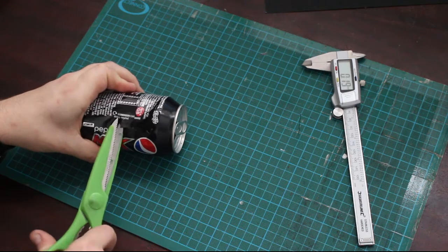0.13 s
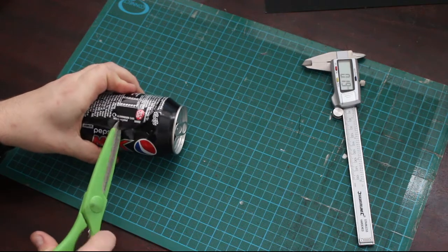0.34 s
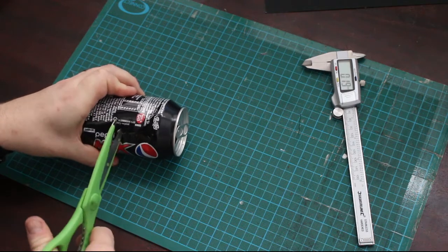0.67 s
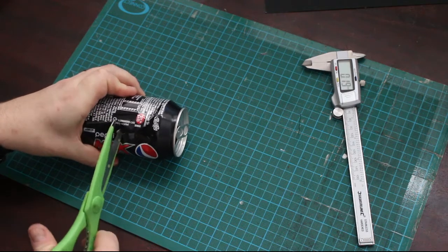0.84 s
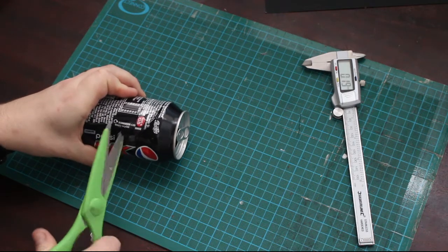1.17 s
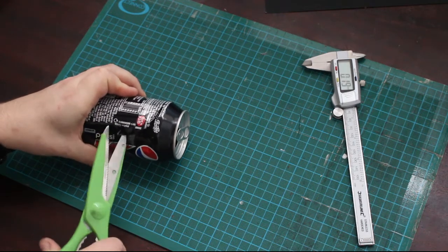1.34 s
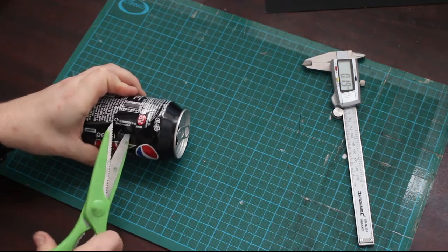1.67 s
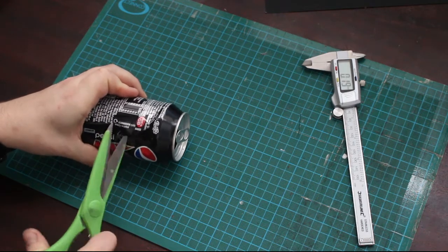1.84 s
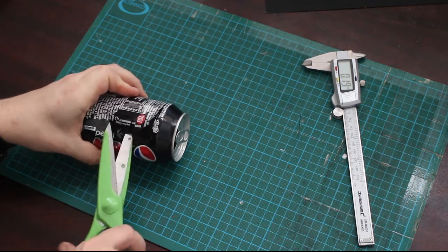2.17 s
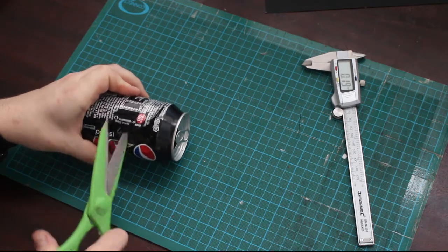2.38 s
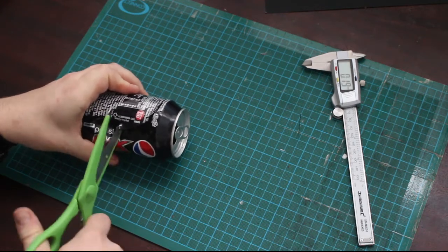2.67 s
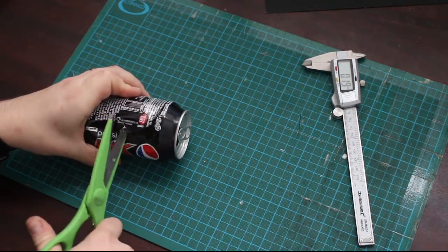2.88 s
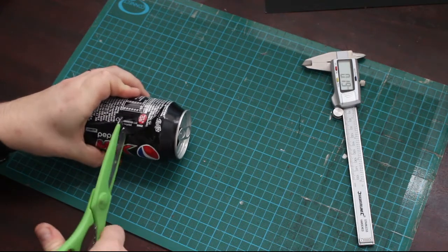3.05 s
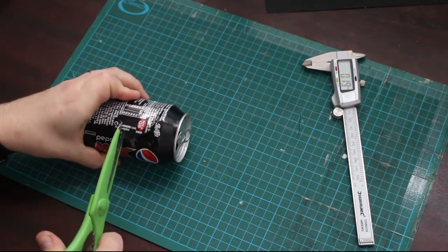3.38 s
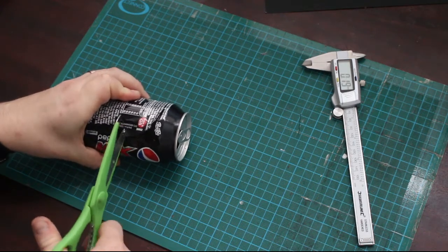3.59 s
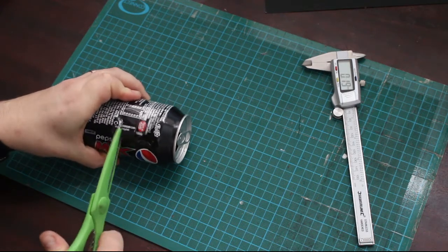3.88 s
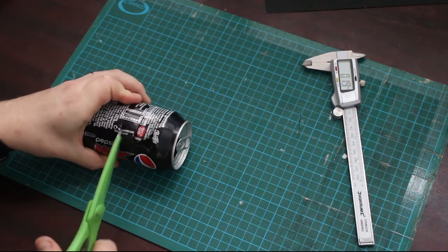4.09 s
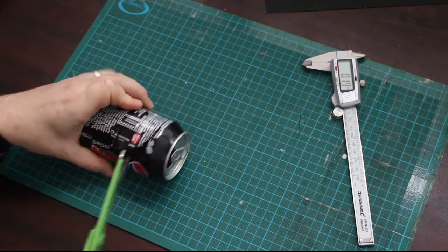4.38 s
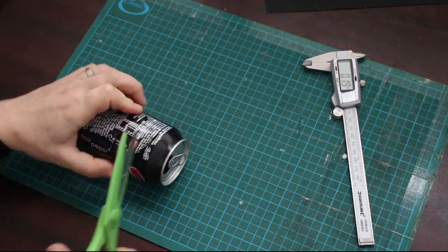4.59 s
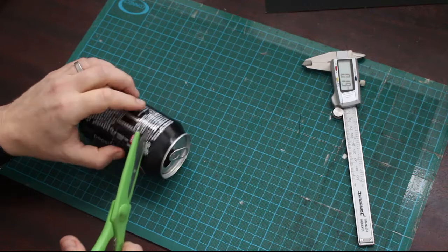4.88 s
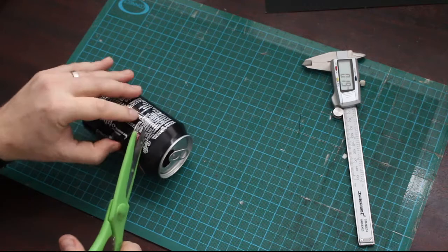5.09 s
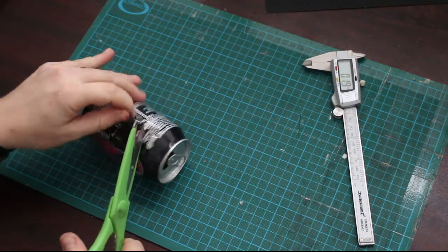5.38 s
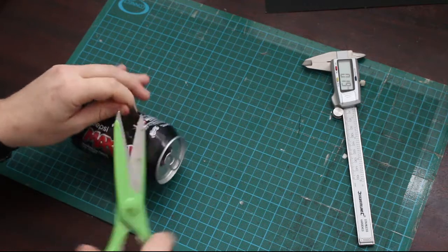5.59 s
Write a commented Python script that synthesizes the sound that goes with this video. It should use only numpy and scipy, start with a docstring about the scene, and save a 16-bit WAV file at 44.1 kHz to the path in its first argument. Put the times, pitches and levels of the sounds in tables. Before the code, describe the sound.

Close, dry cutting of a drinks can: blades rasp, thin metal tears and pops, and the hollow body hoots briefly with each stroke.

```python
"""A small room: kitchen scissors cut the thin wall of an empty aluminium can just above a cutting mat.
The blades rasp (random clicks through the can's resonances) and make the air in the can hoot (a wavering sine).
The wall tears and buckles in snaps (fading noise), dented panels ping and chime (fading sines), the can bumps
the mat (low noise), and hard cuts leave the steel ringing. A low hum, rumble and room tone lie underneath.
A close mono microphone hears it all, overloaded by the hardest snaps."""
import sys
import numpy as np
from scipy import signal
from scipy.fft import rfft, irfft, next_fast_len
from scipy.io import wavfile

SR = 44100
rng = np.random.default_rng(int(sys.argv[2]) if len(sys.argv) > 2 else 0)


def to_wav(sig):
    """Store sig (one row per channel, or 1-D mono) as 16-bit WAV at the path in sys.argv[1].

    Samples outside -1..1 are clipped; the rate is SR.
    """
    pcm = np.clip(np.atleast_2d(sig), -1, 1) * 32767
    pcm = np.round(pcm).astype(np.int16)
    wavfile.write(sys.argv[1], SR, pcm.T)  # frames by channels


N = 252693  # length in samples


def from_db(db):
    """Turn decibels into a plain gain."""
    return 10 ** (np.asarray(db) / 20)


def rms_one(x):
    """Scale the whole sound to rms 1."""
    return x / np.sqrt(np.mean(x ** 2) + 1e-20)


def attack_one(x):
    """Scale so that the first hundredth of a second has rms 1."""
    return x / np.sqrt(np.mean(x[:SR // 100] ** 2) + 1e-20)


def at_hz(points, hz, axis=1):
    """Read a table column at any frequency, with pitch spaced by octaves."""
    points = np.array(points)
    return np.interp(np.log(np.maximum(hz, 1)), np.log(points[:, 0]), points[:, axis])


def fade(t, t60):
    """Die away smoothly, losing 60 dB in t60 seconds."""
    return np.exp(-np.log(1000) * t / max(t60, .002))


def band(x, edges, order=3):
    """Keep only the frequencies between two edges."""
    sos = signal.butter(order, np.minimum(edges, .48 * SR), "band", fs=SR, output="sos")
    return signal.sosfilt(sos, x + 1e-18)


def dull(x, hz, order=2):
    """Soften everything above hz."""
    return signal.sosfilt(signal.butter(order, min(hz, .45 * SR), fs=SR, output="sos"), x)


def resonance(x, hz, width_hz):
    """Ring at one frequency when shaken; a narrow width rings longer."""
    r = np.exp(-np.pi * width_hz / SR)
    push = np.array([1, 0, -1]) * (1 - r * r) / 2
    memory = [1, -2 * r * np.cos(2 * np.pi * hz / SR), r * r]
    return signal.lfilter(push, memory, x + 1e-18)


def add(out, s, x):
    """Mix x into out, starting at s seconds."""
    at = max(round(s * SR), 0)
    out[at:at + len(x)] += x[:max(N - at, 0)]


def waver(n, rate_hz):
    """Slow random wandering of spread 1."""
    return rms_one(dull(rng.standard_normal(n + SR // 10), rate_hz))[-n:]


AMBIENCE_DB = -49.5
HUM_HZ, HUM_DB = 58.4, -59
# tone colour of the room's own noise; only the shape counts: f/Hz, level/dB (per Hz)
AMBIENCE_COLOUR = [(20, -4), (45, -6), (90, -17.5), (220, -13), (380, -17.5), (560, -9.5), (800, -20),
                   (1400, -21), (3500, -26.5), (6000, -32), (8200, -33), (16000, -37)]
# handling rumble through the table, joined by straight lines: t/s, level/dB
HANDLING_RUMBLE = [(0, -73), (1.3, -60), (1.9, -55), (2.3, -52.5), (2.78, -52.5), (2.85, -40), (2.97, -45),
                   (3.4, -67), (3.95, -57), (4.25, -46), (4.6, -51), (5.3, -75), (5.7, -47)]


def background():
    """Coloured noise as room tone, a low sine hum, and low noise for the rumble of hands on the table."""
    t, size = np.arange(N) / SR, next_fast_len(N, True)
    colour = from_db(at_hz(AMBIENCE_COLOUR, np.fft.rfftfreq(size, 1 / SR)))
    noise = irfft(rfft(rng.standard_normal(size)) * colour, size)[:N]
    tone = from_db(AMBIENCE_DB) * rms_one(noise)
    rumble_level = from_db(np.interp(t, *np.transpose(HANDLING_RUMBLE)))
    rumble = rumble_level * rms_one(band(rng.standard_normal(N), (32, 72), order=2))
    hum = from_db(HUM_DB) * np.sqrt(2) * np.sin(2 * np.pi * HUM_HZ * t)
    return tone + rumble + hum


# broad resonances of the can wall: f/Hz, width/Hz, level/dB
WALL_RESONANCES = [(741, 55, 12), (862, 41, 10), (954, 320, -0.5), (1286, 12, 6), (1508, 18, -0.5),
                   (1798.5, 41, 12.5), (2280, 33, -0.5), (2553, 27, 8.5), (3067, 180, 2), (3366, 85, 14),
                   (3500, 2000, 0), (5110, 180, 13.5), (5440, 110, 2.5), (7225, 280, 13.5), (8100, 690, 5)]


def wall(force):
    """The can wall colours whatever shakes it; neighbouring resonances swing in opposite directions."""
    out = 0
    for k, (hz, width_hz, db) in enumerate(WALL_RESONANCES):
        out = out + (-1) ** k * from_db(db) * resonance(force, hz, width_hz)
    return out


def slips(n, per_s, spread_db):
    """Tiny stick-slip clicks of uneven size at random moments."""
    sizes = from_db(spread_db * np.minimum(rng.exponential(1, n), 4))
    return (rng.random(n) < per_s / SR) * sizes * rng.choice([-1, 1], n)


RASP_HZ, HISS_HZ, HISS_TOP_HZ = (780, 2670), (3500, 24000), 7600  # bands of the dragging blade
SWELL_DB, EASE_DB = 11, 11  # pressure builds up to the bite, then eases off
BEND = 0.049  # relative climb of the air pitch over a stroke
CRINKLES_PER_S, CRINKLE_DB = 35, -8  # burrs breaking off under the blade; level against the hiss


def rub(rise, fall, air_hz, air_db, rasp_db, hiss_db):
    """Steel drags on the cut edge: clumps of slips rasp in the wall and keep the air hooting."""
    t, length = np.arange(int(.6 * SR)) / SR, rise + fall
    swell = from_db(np.interp(t, [0, rise, length], [-SWELL_DB, 0, -EASE_DB]))
    pressure = swell * (1 - fade(t, t60=0.004)) * fade(np.maximum(t - length, 0), t60=0.082)
    grip = waver(len(t), rate_hz=47)
    friction = slips(len(t), per_s=7000, spread_db=2.0) * from_db(2.2 * grip)
    metal = wall(friction)
    rasp_sound = dull(band(metal + .35 * friction, RASP_HZ), hz=1500, order=1)
    rasp = from_db(rasp_db) * rms_one(rasp_sound)

    # the finest slips merge into a smooth hiss; single burrs crinkle above it
    grit = (rng.standard_normal(len(t)) + .8 * rms_one(friction)) * from_db(1.5 * grip)
    crinkles = rms_one(slips(len(t), CRINKLES_PER_S, spread_db=-1))
    grit = rms_one(grit) + from_db(CRINKLE_DB) * crinkles
    hiss_sound = band(grit + .5 * wall(grit), HISS_HZ, order=2)
    hiss = from_db(hiss_db) * rms_one(dull(hiss_sound, HISS_TOP_HZ, order=3))

    # a light rasp lets the air hoot smoothly, a heavy one breaks the tone up
    rough = np.clip(1 + (rasp_db - air_db + 4.0) / 16, .15, 1.2)
    # the wall flexes under the blade, so the pitch climbs through the stroke and wanders
    climb = BEND * (np.minimum(t / length, 1.5) - .5)
    bend = climb + 0.061 * rough * waver(len(t), rate_hz=49.3)
    phase = 2 * np.pi * np.cumsum(air_hz * (1 + bend)) / SR
    hoot = rms_one(np.sin(phase) * from_db(6.9 * rough * grip))
    airy_slips = resonance(band(friction, (470, 950)), air_hz * 1.237, width_hz=65)
    rustle = from_db(-1.0) * rough * rms_one(airy_slips)
    air = from_db(air_db) * rms_one(hoot + rustle)
    return pressure * (rasp + hiss + air)


# a blade drags along the cut edge; levels are before the pressure swell:
# start t/s, rise/s, fall/s, mid-stroke air f/Hz, air level/dB, rasp level/dB, hiss level/dB
BLADE_STROKES = [(0, 0.0045, 0.029, 572, -18, -27, -39.5), (.255, 0.019, 0.033, 530, -34, -36.5, -47),
                 (.342, 0.0096, 0.038, 556, -25.5, -42, -51), (.572, 0.034, 0.017, 525, -25, -30.5, -38.5),
                 (.612, 0.014, 0.045, 556.4, -13, -32, -45), (.98, 0.025, 0.054, 539, -42, -50, -66),
                 (1.138, 0.012, 0.11, 543, -26.5, -27, -45), (1.3, 0.034, 0.058, 555, -25, -35.5, -42.5),
                 (1.39, 0.055, 0.14, 590, -29, -33.5, -39.5), (1.71, .1, 0.13, 570, -32.5, -41.5, -52),
                 (1.94, 0.038, 0.16, 580, -27.5, -37, -49.5),
                 (2.287, 0.031, 0.018, 594.3, -16.5, -19.5, -34),
                 (2.438, 0.04, 0.022, 560, -18, -15.5, -35.5), (2.775, 0.0055, 0.089, 550, -33, -43, -57),
                 (2.91, 0.1, 0.063, 595, -22, -31, -49), (3.09, 0.045, 0.066, 524.6, -28, -33.5, -48.5),
                 (3.497, 0.038, 0.074, 527.8, -19, -29, -43), (3.745, .02, 0.063, 581, -20.5, -29, -43),
                 (3.822, 0.005, 0.055, 552, -14, -30, -42), (3.99, 0.0053, 0.162, 568, -30, -36, -36.5),
                 (4.128, 0.0087, 0.023, 584, -20, -33, -45),
                 (4.168, 0.015, 0.077, 559.6, -21.5, -25, -26.5), (4.36, 0.085, .31, 565, -51, -45.5, -51),
                 (4.82, 0.035, 0.053, 585, -31, -41, -54), (4.895, 0.036, 0.16, 572, -33, -38.5, -46),
                 (5.12, 0.0066, 0.047, 588, -17.5, -25.5, -37.5),
                 (5.458, 0.024, 0.0035, 554.5, -21, -30, -27)]


def strokes(out):
    """Each drag of a blade, pressing harder and then easing off."""
    for s, rise, fall, *stroke in BLADE_STROKES:
        add(out, s, rub(max(rise, .003), max(fall, .003), *stroke))


# the room's answer: f/Hz, level/dB, t60/s
ROOM_ANSWER = [(150, -1, 0.29), (517, -13.5, 0.22), (1180, -14.5, 0.38), (2520, -12.5, 0.4),
               (4930, -10, 0.4), (9200, -13.5, 0.43), (15000, -8.5, 0.26)]


def room(x):
    """A diffuse tail builds up after the first wall echoes and dies band by band."""
    t = np.arange(int(.7 * SR)) / SR
    edges = np.geomspace(100, 17000, 13)
    build_up = 1 - fade(np.maximum(t - .004, 0), t60=0.034)
    response = np.zeros(len(t))
    for low, high in zip(edges, edges[1:]):
        hz = np.sqrt(low * high)
        die_away = fade(t, at_hz(ROOM_ANSWER, hz, axis=2))
        tail = band(rng.standard_normal(len(t)), (low, high)) * build_up * die_away
        # a wider band carries more of the tail
        share = np.sqrt(2 * (high - low) / SR / len(t))
        response += from_db(at_hz(ROOM_ANSWER, hz)) * rms_one(tail) * share
    return signal.fftconvolve(x, response)[:N]


# bands of a snap
THUD_HZ, BUCKLE_HZ, TEAR_HZ, CRACK_HZ = (188, 680), (626, 2310), (2200, 6200), (6000, 20000)
# top-end crack against the tear (dB); brighter snaps crack harder (dB per dB of brightness)
CRACK_DB, CRACK_PER_BRIGHTNESS = -9.5, 0.38
THUD_DB = -23.5  # low thud against the buckle
AIR_HZ, AIR_SPREAD = 566.6, 0.023  # air in the can; its pitch shifts as the slit opens and closes


def snap(level_db, brightness_db, t60, air_db, panel_hz, crack_db):
    """One sharp give and a dying cascade of tiny fractures shake the wall and kick the air inside."""
    t = np.arange(int(.3 * SR)) / SR
    # brightness tilts the level from the low buckle towards the high tear
    buckle_db, tear_db = level_db - brightness_db / 2, level_db + brightness_db / 2
    top_db = tear_db + crack_db + CRACK_PER_BRIGHTNESS * brightness_db
    give = 2.3 * fade(t, t60=.009)
    cascade = fade(t, t60) + from_db(1.0) * fade(t, t60 * 2.42)
    force = rng.choice([-1, 1], len(t)) * (give + cascade)
    metal = force + from_db(-2.5) * wall(force)
    metal = metal + from_db(8) * resonance(metal, panel_hz, panel_hz * .2)

    buckle = from_db(buckle_db) * attack_one(band(metal, BUCKLE_HZ))
    tear = from_db(tear_db) * attack_one(band(metal, TEAR_HZ, order=4))
    crack = from_db(top_db) * attack_one(dull(band(metal, CRACK_HZ), hz=8500, order=2))
    thud = from_db(buckle_db + THUD_DB) * attack_one(band(force, THUD_HZ))
    air_hz = AIR_HZ * (1 + AIR_SPREAD * rng.standard_normal())
    air_fade = fade(t, t60=0.044) + from_db(-26) * fade(t, t60=0.2)
    hoot = np.sin(2 * np.pi * air_hz * t) * air_fade * (1 - fade(t, t60=0.018))
    return buckle + tear + crack + thud + from_db(air_db) * attack_one(hoot)


# the wall tears; brightness is tear minus buckle, level their midpoint, t60 that of the faster cascade:
# t/s, level/dB, brightness/dB, t60/s, air level/dB, panel f/Hz
WALL_SNAPS = [(.058, -27.5, 19, 0.045, -31, 3600), (.135, -32.5, 10, .019, -39, 8650),
              (.342, -36.5, 5, 0.019, -28.5, 2770), (0.604, -20, -2.5, 0.043, -20, 3200),
              (1.2063, -20.5, -3, 0.04, -18.5, 1080), (1.453, -22.5, -2, 0.045, -17.5, 1630),
              (1.4615, -20.5, 9.5, 0.034, -21.5, 3720), (1.56, -29, 2, 0.055, -14.5, 1640),
              (1.807, -35, -15, 0.039, -26.5, 1670), (2.045, -28, -11, 0.071, -41, 910),
              (2.066, -20.5, -7, 0.058, -21.5, 1440), (2.3218, -16, 3.5, 0.039, -19, 1580),
              (2.4272, -16.5, -13, 0.017, -16, 1330), (2.466, -20, -5.5, 0.044, -22, 1700),
              (2.4766, -20, -7.5, 0.02, -12.5, 1710), (2.484, -20.5, 2.5, 0.018, -26, 3010),
              (2.524, -23.5, -1.5, 0.087, -23.5, 1850), (2.813, -29.5, -14, 0.046, -36, 1050),
              (3.0246, -30, -6, 0.036, -20.5, 990), (3.145, -31.5, -5.5, .031, -28, 1800),
              (3.59, -22, 7, 0.027, -25.5, 2400), (3.674, -35.5, -13.5, .018, -35.5, 920),
              (3.7789, -21, -6, 0.024, -37, 1100), (3.832, -28, -4, 0.03, -21, 1760),
              (3.8707, -26, -5, 0.024, -17.5, 2920), (3.916, -20, -8.5, 0.0091, -28, 1070),
              (3.9187, -13.5, 9, 0.011, -14.5, 3470), (3.948, -16.5, 4, 0.047, -21, 5500),
              (3.974, -17.5, 5, 0.032, -17.5, 2860), (3.981, -24, 7, 0.02, -32, 2720),
              (4.1232, -26, -5, 0.055, -15, 1240), (4.159, -17, -4.5, 0.055, -13.5, 940),
              (4.182, -15.5, 14.5, 0.019, -27, 4830), (4.455, -39.5, -8, 0.027, -39.5, 1630),
              (4.556, -44, -9.5, 0.061, -44, 1180), (4.809, -24.5, 0.5, 0.058, -21, 1970),
              (4.817, -27, 5.5, 0.069, -29, 3530), (4.946, -18, 0.5, 0.066, -12, 3900),
              (4.962, -19, 12.5, 0.048, -23.5, 4960), (5.007, -16.5, 7, 0.029, -15.5, 3840),
              (5.14, -26, -2, 0.025, -38, 1760), (5.3752, -25.5, -8, 0.075, -15, 1500),
              (5.3781, -11, 11.5, 0.023, -20, 4080), (5.48, -21.5, 12, 0.045, -31.5, 5000),
              (5.492, -19.5, 15.5, .021, -43, 4370), (5.498, -23.5, 12, 0.043, -54, 4950)]


def snaps(out):
    """Each tear of the wall, a snap with its own brightness and panel pitch."""
    for s, *blow in WALL_SNAPS:
        add(out, s, snap(*blow, CRACK_DB))


def ping(hz, level_db, t60):
    """Metal rings in a cluster of close modes that beat; some die sooner than others."""
    t = np.arange(int(.7 * SR)) / SR
    modes = 0
    # relative detuning, size, share of t60
    for detune, size, life in [(-.07, 0.052, 0.57), (-.024, 0.61, 1), (0, 1, 0.58), (.021, .5, 1), (.06, 0.13, 1)]:
        phase = 2 * np.pi * hz * (1 + detune + rng.normal(0, .003)) * t
        modes = modes + size * np.sin(phase) * fade(t, t60 * life)
    return from_db(level_db) * attack_one(modes * (1 - fade(t, t60=0.023)))


CHIME_DB, CHIME_SPREAD_DB = -8.5, 8  # against the pop; change of each mode from pop to pop
# the whole can chimes when a dent pops, levels before the random change: f/Hz, level/dB, t60/s
CAN_CHIME = [(1186, -18, 0.24), (1248, -3.5, 0.087), (1760, -11, 0.17), (2240, 4, 0.093),
             (2304, -17.5, 0.36), (3085, -23, 0.18), (3470, -17.5, 0.13), (3540, -10.5, 0.14)]


def chime():
    """The can's modes ring together, each shaken by a different amount every time."""
    t = np.arange(int(.4 * SR)) / SR
    modes = 0
    for hz, mode_db, t60 in CAN_CHIME:
        size = from_db(mode_db + rng.normal(0, CHIME_SPREAD_DB)) * rng.choice([-1, 1])
        modes = modes + size * np.sin(2 * np.pi * hz * t) * fade(t, t60)
    return attack_one(modes)


POP_T60_S, POP_CRACK_DB, POP_AIR_DB = 0.016, -19, -8.5  # crack against the tear, air against the buckle
POP_NEUTRAL_HZ, POP_BRIGHTNESS_DB_PER_OCTAVE = 2210, 21  # smaller dents ring higher and pop brighter


def pop(level_db, hz):
    """A dent flips over: a short snap without tearing, the brighter the higher the dent rings."""
    brightness_db = POP_BRIGHTNESS_DB_PER_OCTAVE * np.log2(hz / POP_NEUTRAL_HZ)
    air_db = level_db - brightness_db / 2 + POP_AIR_DB
    out = from_db(level_db + CHIME_DB) * chime()
    add(out, 0, snap(level_db, brightness_db, POP_T60_S, air_db, hz, POP_CRACK_DB))
    return out


# a dent springs free and rings:
# t/s, pop level/dB, main f/Hz, main level/dB, second f/Hz, second level/dB, t60/s
DENT_POPS = [(.598, -20.5, 3075, -18, 5480, -40, 0.033), (0.6954, -21, 1700, -20.5, 3394, -28.5, 0.093),
             (0.8288, -20.5, 2795, -23, 5590, -36, 0.059), (1.2291, -18, 2890, -20.5, 3600, -41, 0.041),
             (1.301, -34, 2190, -29.5, 2690, -42, 0.075), (1.651, -28, 1280, -30, 3040, -32.5, 0.034),
             (3.281, -33, 1275, -24, 3400, -31.5, 0.085), (3.594, -25, 2510, -25.5, 5930, -30.5, 0.067),
             (3.803, -29, 1785, -23, 2320, -42, 0.18)]


def pops(out):
    """Each dent flips with a pop, and its panel pings at two pitches."""
    for s, pop_db, main_hz, main_db, second_hz, second_db, t60 in DENT_POPS:
        add(out, s, pop(pop_db, main_hz))
        add(out, s, ping(main_hz, main_db, t60) + ping(second_hz, second_db, t60))


BUMP_T60_S = 0.067


def bump(level_db):
    """The dull knock of the can on the mat: fading low noise."""
    t = np.arange(int(.3 * SR)) / SR
    knock = rng.standard_normal(len(t)) * fade(t, BUMP_T60_S)
    return from_db(level_db) * attack_one(band(knock, THUD_HZ))


# the can bumps the mat: t/s, level/dB
MAT_BUMPS = [(1.147, -35), (1.562, -36), (1.651, -34), (2.069, -29.5), (2.813, -29.5), (2.831, -36),
             (4.159, -29.5), (4.556, -36)]


def bumps(out):
    """Each touch of the can on the mat."""
    for s, level_db in MAT_BUMPS:
        add(out, s, bump(level_db))


# the steel rings on after a hard cut: t/s, f/Hz, level/dB, t60/s
STEEL_RINGS = [(4.181, 5200, -44.5, 0.99), (5.493, 7400, -42, .17)]


def blade_rings(out):
    """The scissors' steel rings with a high, beating ping."""
    for s, hz, level_db, t60 in STEEL_RINGS:
        add(out, s, ping(hz, level_db, t60))


def scene():
    """Close sounds, their room tail and the background, the same on both channels."""
    close = np.zeros(N)
    for play in (strokes, snaps, pops, bumps, blade_rings):
        play(close)
    mono = close + room(close) + background()
    return np.array([mono, mono])


CUTOFF_HZ = 16000


def record(dry):
    """Anything beyond full scale is clipped flat, then the top is cut steeply."""
    clipped = np.clip(dry, -1, 1)
    return signal.sosfilt(signal.ellip(10, .1, 80, CUTOFF_HZ, fs=SR, output="sos"), clipped)


dry = scene()
out = record(dry)
to_wav(out)
```